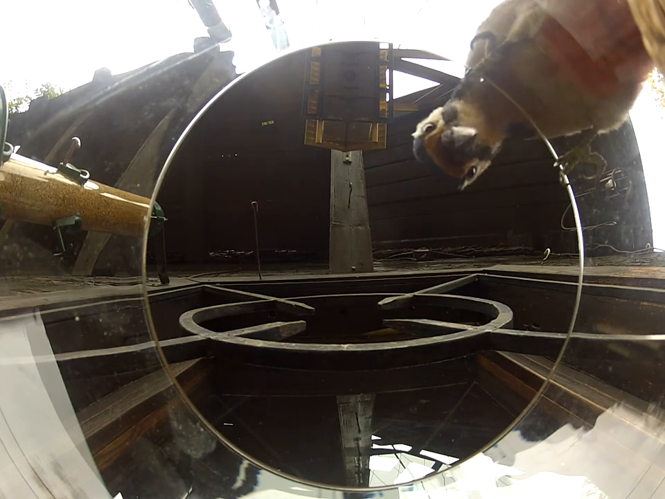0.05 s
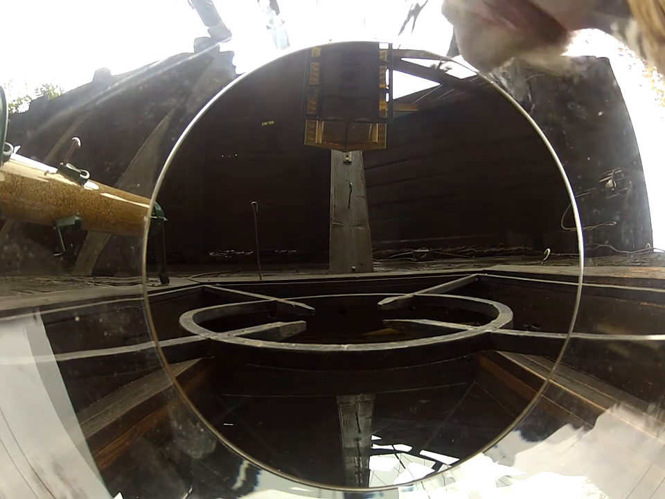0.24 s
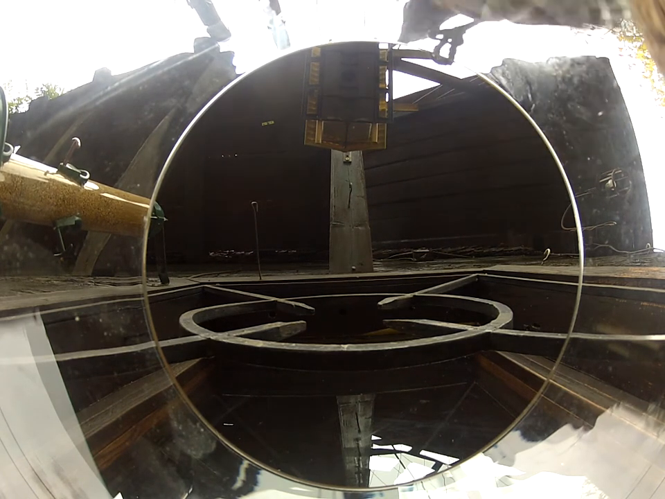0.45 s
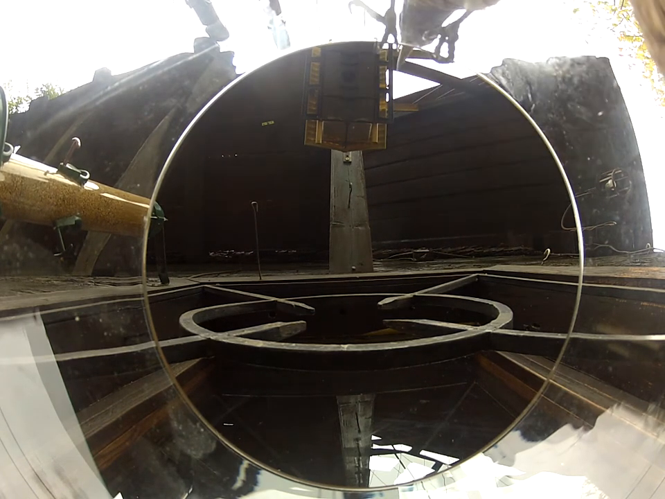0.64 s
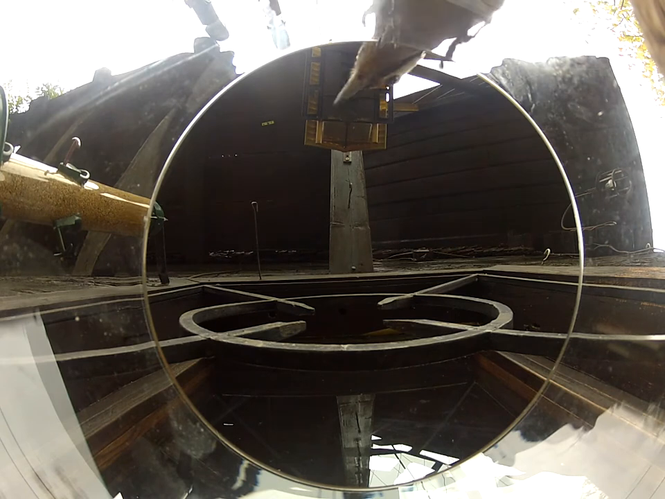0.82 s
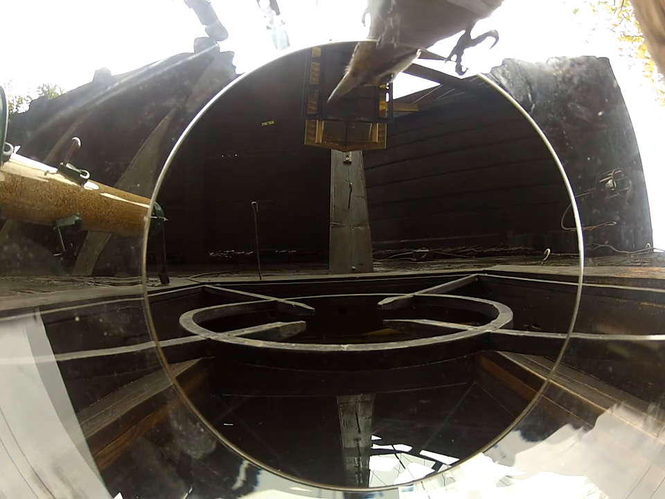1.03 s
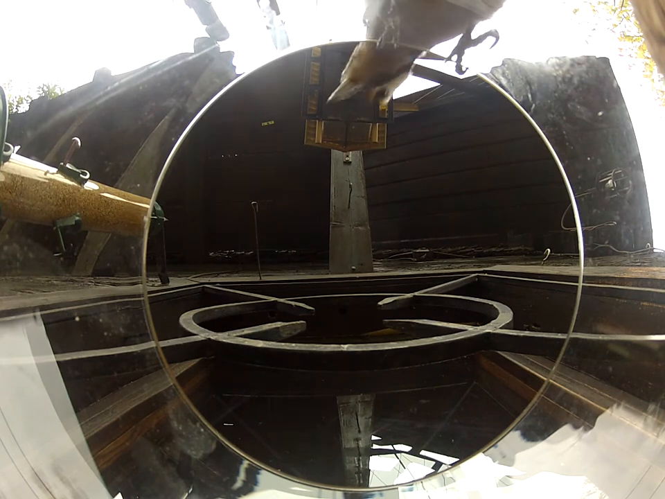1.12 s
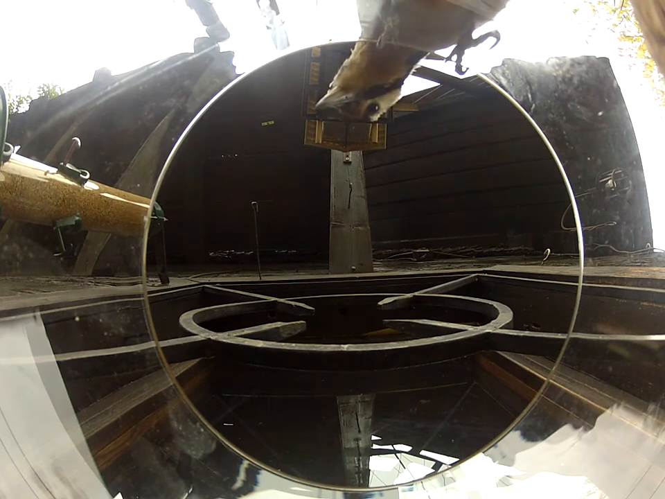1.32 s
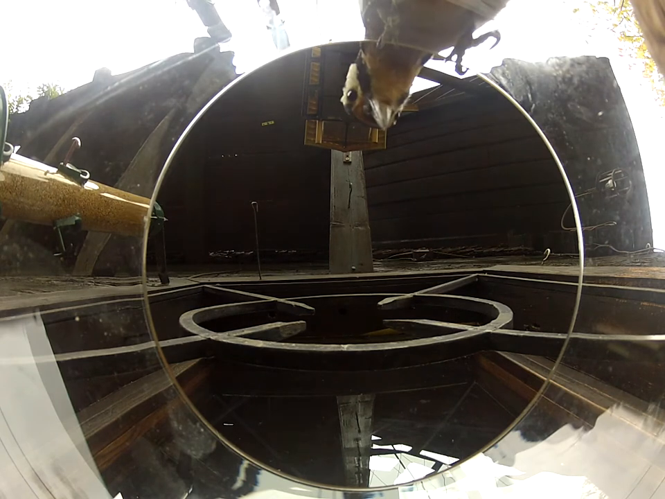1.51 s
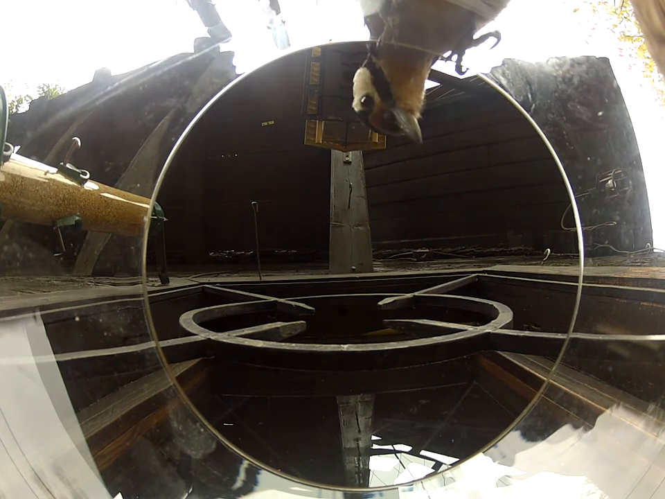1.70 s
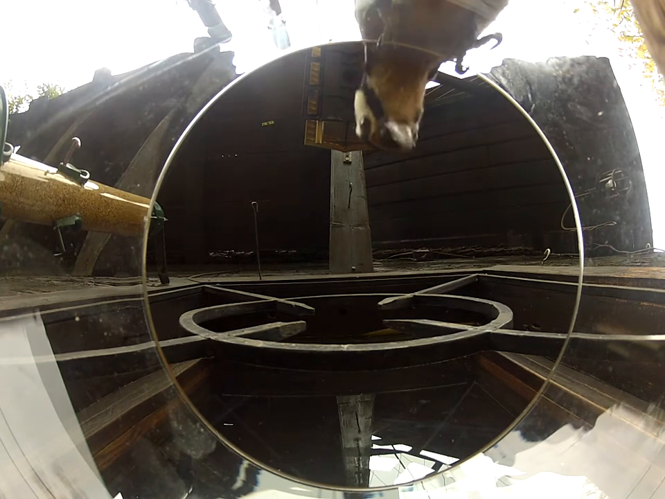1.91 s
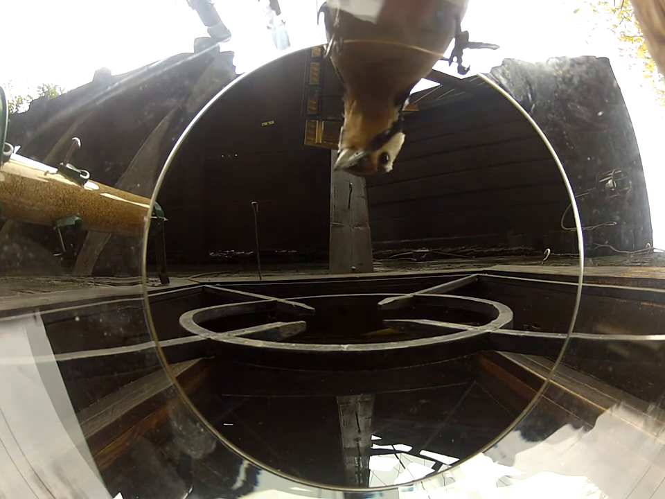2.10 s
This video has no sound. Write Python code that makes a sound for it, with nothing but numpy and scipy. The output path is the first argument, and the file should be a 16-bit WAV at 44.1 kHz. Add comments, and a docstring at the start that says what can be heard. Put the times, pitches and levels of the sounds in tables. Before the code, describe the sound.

A woodpecker's claws and beak clink and knock on a glass and metal feeder.

```python
"""At an outdoor feeder of glass and metal, heard through a small camera fixed inside it.
A woodpecker hops about over faint hiss. Its claws and beak clink, scrape and squeak on the shell;
its weight thumps the housing and rocks the mount, and both tremble between bumps.
The camera samples at a low rate and holds each sample, which mirrors every ring up into the treble."""
import sys
import numpy as np
from scipy import signal
from scipy.fft import rfft, irfft
from scipy.io import wavfile
from scipy.ndimage import map_coordinates

SR = 44100
rng = np.random.default_rng(int(sys.argv[2]) if len(sys.argv) > 2 else 0)


def dump_mix(stems):
    """Bounce the given channels to the path in sys.argv[1] as a 16-bit WAV at rate SR."""
    frames = np.atleast_2d(stems).T  # one column per channel
    limited = np.clip(frames, -1, 1)  # hard clip at full scale
    pcm = np.round(limited * 32767).astype(np.int16)
    wavfile.write(sys.argv[1], SR, pcm)


N = 94815

# Outdoor hiss spectrum. Each row: frequency in Hz, relative density in dB.
AIR_SPECTRUM = [(13, -21.5), (22, 3), (170, -7.5), (202, -12.5), (278, -24), (337, -12.5), (485, -23.5),
                (1090, -21.5), (1380, -25.5), (3600, -27.5), (4680, -36), (7920, -120)]
# Modes of shell, housing and mount. Each row: frequency in Hz, level in dB, T60 in seconds.
SHELL_MODES = [(408.2, -15, 0.45), (1037, -23, 0.86), (1804, -15, 0.047), (1899, -28, 0.26),
               (2478, -18.5, .045), (2795, -32, 0.084), (2985, -23.5, 0.3), (3300, -34, 0.036),
               (3233, -6, 0.028), (3248, -3, .11), (3430, -27.5, 0.023), (3524, -5.5, 0.1)]
HOUSING_MODES = [(190.3, -7, .12), (193.86, -0.5, 0.17), (221, -24, 0.18), (415.5, -13, 0.31),
                 (462.4, -15.5, 0.11)]
MOUNT_MODES = [(38.7, -5.5, 0.3), (54, -12, 0.032), (97.1, 3, 0.12), (114.3, -6.5, 0.19)]
# Envelope of the feeder's tremble. Each row: time in seconds, level in dB.
TREMBLE_ENVELOPE = [(0, -61.5), (.12, -52.5), (.22, -26), (.33, -53), (0.419, -40), (.7, -54), (0.902, -39),
                    (1.08, -59.5), (1.202, -54.5), (1.35, -58), (1.55, -57.5), (1.702, -58.5), (1.88, -66),
                    (2.0, -41), (2.15, -43)]
# Claw drags. Each row: start in seconds, length in seconds, force level in dB.
CLAW_DRAGS = [(0.116, .06, -58), (0.207, .04, -34), (0.23, 0.053, -67), (0.402, .012, -38),
              (0.45, .05, -54), (0.543, 0.017, -44.5), (0.583, .02, -71), (0.626, .03, -63),
              (0.86, .03, -49.5), (1.978, 0.041, -56), (2.056, 0.0072, -44), (2.107, .012, -62)]
# Foot and body bumps. Each row: mid-contact time in seconds, housing gain in dB, mount gain in dB,
# contact length in ms, rattle level in dB.
BODY_BUMPS = [(0.059, -51, -46, 3.6, -67), (0.125, -44.5, -65, 4.5, -58), (0.146, -35.5, -57, 5, -47),
              (.174, -31, -32, 3.6, -44), (0.203, -22, -22, 2.3, -45), (.217, -19, -22, 2.27, -34),
              (0.236, -15.5, -69, 2.93, -36.5), (.271, -21, -22.5, 2.5, -62), (.292, -8.5, -52, 2.7, -23),
              (.318, -13.5, -12.5, 2.93, -30.5), (0.3362, -31, -15.5, 5.9, -36),
              (0.395, -67, -43, 12, -42.5), (.4624, -23.5, -18, 3.8, -47), (0.5249, -26, -21.5, 4.5, -41.5),
              (.573, -31.5, -66, 4, -48.5), (.636, -37, -50, 3.7, -52), (.683, -64, -44, 5.5, -75),
              (0.7452, -29, -46.5, 3.02, -52), (0.791, -33, -35.5, 6.1, -57), (0.818, -45, -32, 4.3, -50),
              (.840, -27.5, -39, 2.05, -37.5), (0.863, -47, -58, 2, -45), (.891, -32.5, -28.5, 4.4, -50),
              (0.93, -31.5, -55, 8.6, -58), (.981, -45, -55, 3.8, -62), (1.027, -47.5, -46.5, 4.3, -76),
              (1.162, -45.5, -42, 7, -79), (1.191, -50, -40.5, 9.1, -79), (1.247, -51, -53, 5.3, -76),
              (1.909, -53, -50.5, 4.3, -65), (1.925, -63.5, -38, 8.9, -67), (1.947, -48, -40, 8.1, -60),
              (1.971, -41, -47.5, 6.6, -51.5), (1.991, -44, -48, 2, -51), (2.0408, -25.5, -32, 2.24, -37.5),
              (2.087, -38, -17.5, 13.3, -42), (2.105, -25.5, -29.5, 4.8, -55),
              (2.131, -33.5, -38, 4.1, -66)]
# Claw and beak taps. Each row: start in seconds, gain in dB, tilt in dB per octave, skid decay in ms.
HARD_TAPS = [(0.1581, -56, -3, 6), (.171, -47, -6.5, 21), (.199, -49, 7, 12), (.2202, -26, 2, 10),
             (0.2319, -27.5, -0.5, 8.4), (.238, -25, -5, 5.9), (.2925, -41, 10, 4.5), (.3155, -35, 5, 10),
             (.3245, -34, -11.5, 10), (.404, -44.5, 19, 6), (0.443, -50.5, -10.5, 8),
             (0.524, -47.5, 22, 6.7), (.536, -38.5, 7.5, 7.9), (0.7438, -47, 7, 4.4),
             (.8392, -33.5, 3.5, 3.6), (0.8529, -28.5, 5.5, 6), (0.9041, -30.5, 5, 2.4),
             (1.971, -53, 12, 18), (2.011, -62, -5, 13), (2.0607, -35, 4, 7.5)]


def amp(db):
    """Decibels to gain."""
    return 10 ** (np.asarray(db) / 20)


def unit_rms(x):
    """Scale to rms 1."""
    return x / np.sqrt(np.mean(x ** 2))


def decay(t60_s):
    """One second of exponential decay."""
    return np.exp(-np.log(1000) * np.arange(SR) / SR / t60_s)


def add(out, start_s, sound):
    """Mix a sound in at start_s."""
    i = max(int(start_s * SR), 0)
    part = sound[:max(N - i, 0)]
    out[i:i + len(part)] += part


def lowpass(x, hz, order):
    """Butterworth low-pass."""
    return signal.sosfilt(signal.butter(order, hz, fs=SR, output="sos"), x)


def rings(modes):
    """One second of free ringing, one row per mode."""
    t = np.arange(SR) / SR
    return np.array([amp(db) * decay(t60_s) * np.sin(2 * np.pi * hz * t) for hz, db, t60_s in modes])


def air(level_db=-67.5, low_cut_hz=240):
    """Faint, steady outdoor hiss."""
    hz, db = np.array(AIR_SPECTRUM).T
    bins_hz = np.maximum(np.arange(N // 2 + 1) * SR / N, 1)
    colour = amp(np.interp(np.log(bins_hz), np.log(hz), db))
    colour *= np.minimum(bins_hz / low_cut_hz, 1) ** 2
    return amp(level_db) * unit_rms(irfft(rfft(rng.standard_normal(N)) * colour, N))


def tremble(housing_db=-0.5):
    """The shifting bird keeps mount and housing quivering."""
    ring = rings(MOUNT_MODES).sum(axis=0) + amp(housing_db) * rings(HOUSING_MODES).sum(axis=0)
    quiver = signal.fftconvolve(rng.standard_normal(N + SR - 1), ring * decay(t60_s=0.12), mode="valid")
    times_s, db = np.array(TREMBLE_ENVELOPE).T
    envelope = amp(np.interp(np.arange(N) / SR, times_s, db))
    return envelope * unit_rms(lowpass(quiver, hz=253, order=1))


def claw_squeak(start_s=0.953, length_s=0.04, from_hz=3350, to_hz=2800, jitter=0.081, level_db=-62):
    """Fast, unsteady stick-slip; pitch falls as the claw slows."""
    out, n = np.zeros(N), int(length_s * SR)
    wobble = unit_rms(lowpass(rng.standard_normal(n), hz=500, order=1))
    pitch_hz = np.linspace(from_hz, to_hz, n) * (1 + jitter * wobble)
    tone = np.sin(2 * np.pi * np.cumsum(pitch_hz) / SR)
    add(out, start_s, amp(level_db) * unit_rms(np.hanning(n) * tone))
    return out


def claw_scrapes(slips_per_s=900, spread_db=9):
    """Claws catch and slip in tiny uneven clicks that keep the shell ringing."""
    slips = (rng.random(N) < slips_per_s / SR) * rng.standard_normal(N)
    slips *= amp(spread_db * rng.standard_normal(N))
    force = np.zeros(N)
    for start_s, length_s, db in CLAW_DRAGS:
        drag = slips[int(start_s * SR):int((start_s + length_s) * SR)]
        add(force, start_s, amp(db) * drag / (np.linalg.norm(drag) + 1e-9))
    return signal.fftconvolve(force, rings(SHELL_MODES).sum(axis=0))[:N]


def body_thumps(mount_lead_s=0.005, mount_build_s=0.028):
    """Each soft push rings the housing and rocks the mount, with a dull rattle."""
    out = np.zeros(N)
    housing = rings(HOUSING_MODES).sum(axis=0)
    # The mount gives way first, then swings up.
    mount = -rings(MOUNT_MODES).sum(axis=0) * (1 - decay(mount_build_s))
    t = np.arange(SR // 20) / SR
    for middle_s, housing_db, mount_db, contact_ms, rattle_db in BODY_BUMPS:
        contact_s = contact_ms / 1000
        start_s = middle_s - contact_s / 2
        push = np.sin(np.pi * np.minimum(t / contact_s, 1)) ** 2
        push /= push.sum()
        add(out, start_s, amp(housing_db) * signal.fftconvolve(housing, push))
        add(out, start_s - mount_lead_s, amp(mount_db) * signal.fftconvolve(mount, push))
        rattle = unit_rms(lowpass(rng.standard_normal(SR), hz=400, order=2))
        add(out, middle_s, amp(rattle_db) * rattle * decay(t60_s=0.047))
    return out


def shell_clinks(pivot_hz=3440, scatter_db=1.2, tick_base_db=-11, rasp_db=-6, attack_s=0.004):
    """Claw and beak tick, skid and ring the shell; the mode mix depends on where each tap lands."""
    out, modes = np.zeros(N), rings(SHELL_MODES)
    octaves = np.log2(np.array(SHELL_MODES)[:, 0] / pivot_hz).clip(-1, 1)
    t_ms = np.arange(SR) * 1000 / SR
    rasp_band = signal.butter(2, [3198, 3448], "band", fs=SR, output="sos")
    for start_s, db, tilt_db_per_octave, skid_ms in HARD_TAPS:
        mode_db = tilt_db_per_octave * octaves + scatter_db * rng.standard_normal(len(modes))
        ring = amp(mode_db) @ modes
        tick = lowpass(rng.standard_normal(SR), hz=3000, order=1)
        tick *= amp(tick_base_db - tilt_db_per_octave / 2) * decay(t60_s=0.034)
        skid = np.exp(-t_ms / skid_ms)
        friction = signal.sosfilt(rasp_band, rng.standard_normal(SR))
        rasp = amp(rasp_db) * skid.std() * unit_rms(skid * friction)
        add(out, start_s, amp(db) * (1 - decay(attack_s)) * (ring + rasp + tick))
    return out


def scene():
    """Mono, close and dry: sound reaches the microphone through the feeder itself."""
    return (shell_clinks() + claw_scrapes() + claw_squeak() + body_thumps() + tremble() + air())[None]


def record(dry):
    """The camera cuts deep bass and treble, then samples and holds; mirror images fill the top."""
    low_cut_hz, input_edge_hz, output_edge_hz = 8, 3583, 15150
    sample_hz, hold_hz = 8000, 32000
    x = signal.sosfilt(signal.butter(1, low_cut_hz, "high", fs=SR, output="sos"), dry[0])
    bins_hz = np.arange(N + 1) * SR / (2 * N)
    input_gain = 1 / np.sqrt(1 + (bins_hz / input_edge_hz) ** 35)
    narrow = irfft(rfft(np.r_[x, x[::-1]]) * input_gain)
    samples = map_coordinates(narrow, [np.arange(0, 2 * N, SR / sample_hz)], mode="nearest")
    steps = np.repeat(samples, hold_hz // sample_hz)
    held = signal.resample_poly(steps, SR, hold_hz)[:N]
    output_lowpass = signal.ellip(10, 0.2, 70, output_edge_hz, fs=SR, output="sos")
    return signal.sosfilt(output_lowpass, held)[None]


dry = scene()
out = record(dry)
dump_mix(out)
```